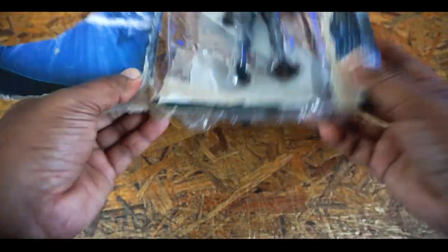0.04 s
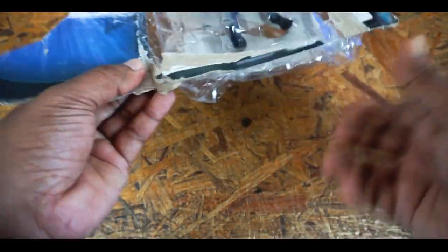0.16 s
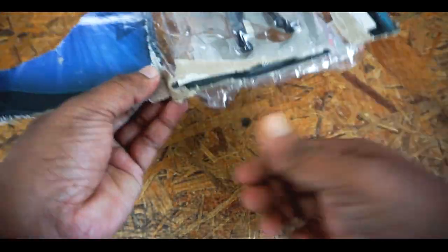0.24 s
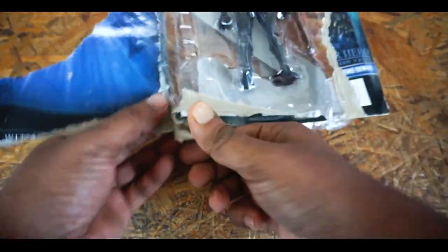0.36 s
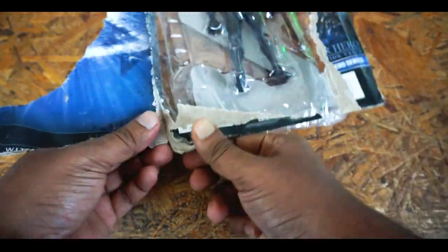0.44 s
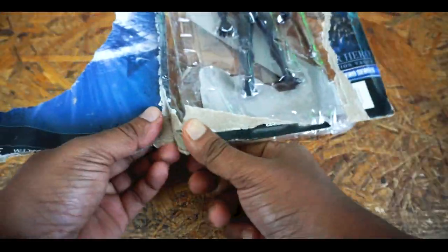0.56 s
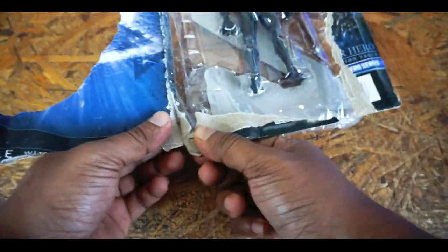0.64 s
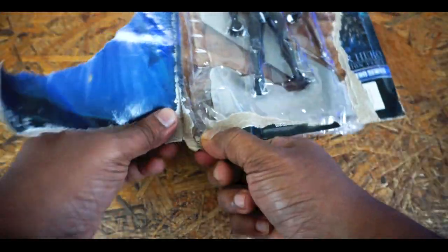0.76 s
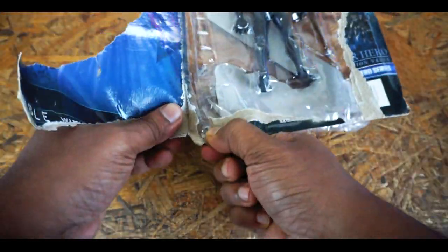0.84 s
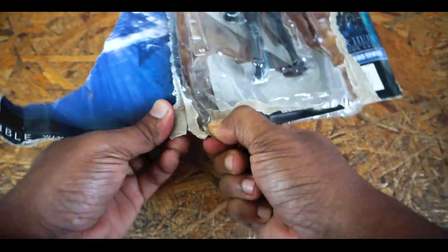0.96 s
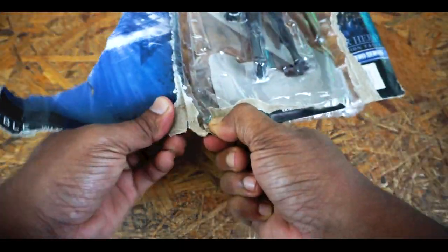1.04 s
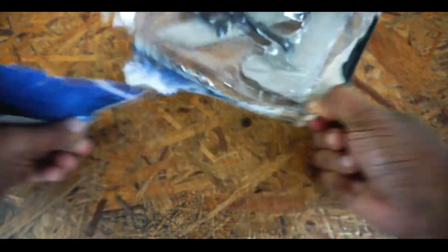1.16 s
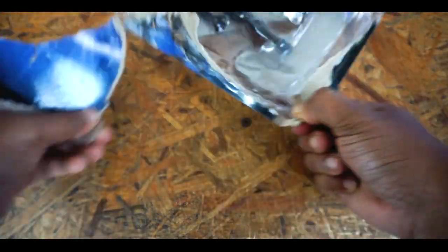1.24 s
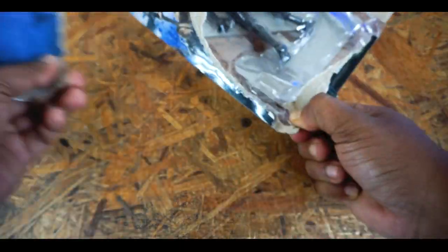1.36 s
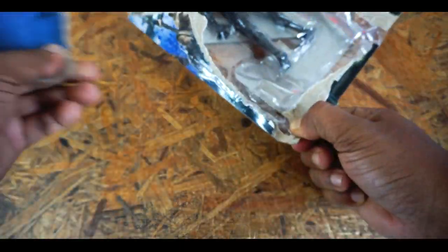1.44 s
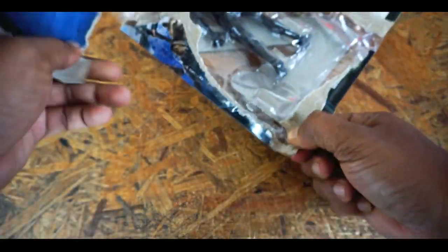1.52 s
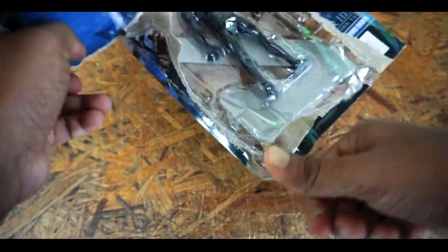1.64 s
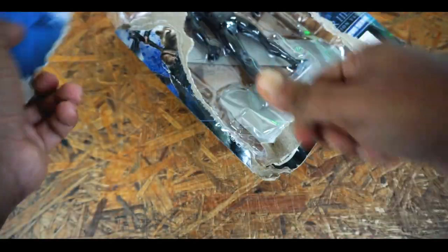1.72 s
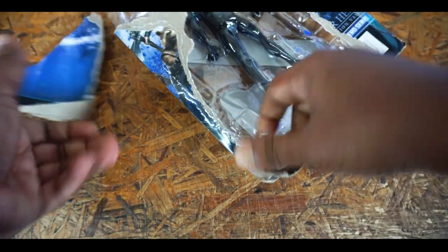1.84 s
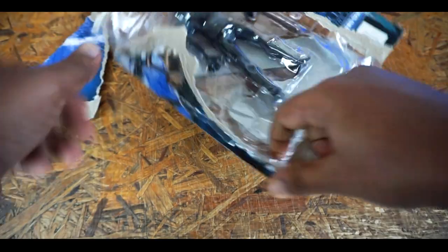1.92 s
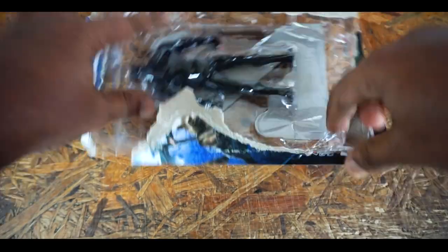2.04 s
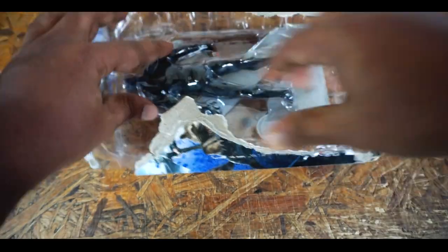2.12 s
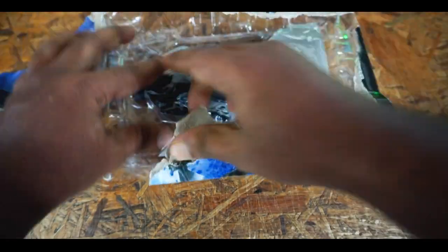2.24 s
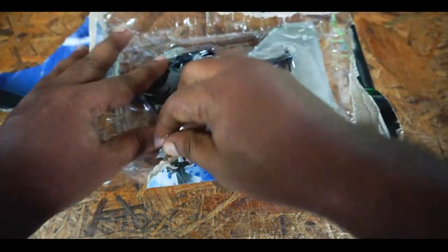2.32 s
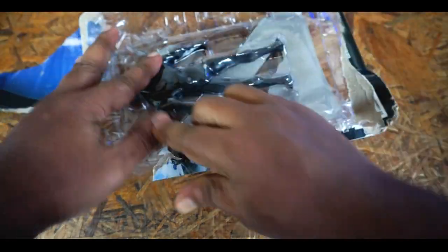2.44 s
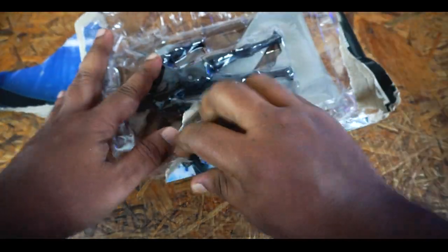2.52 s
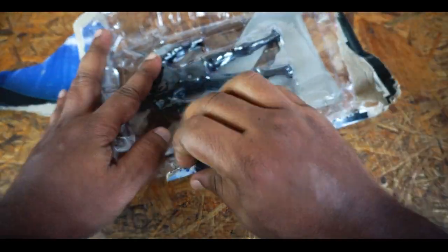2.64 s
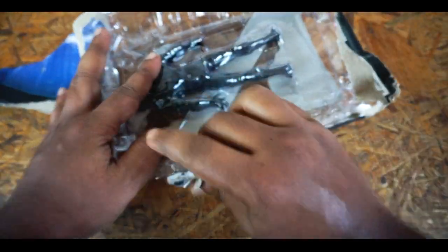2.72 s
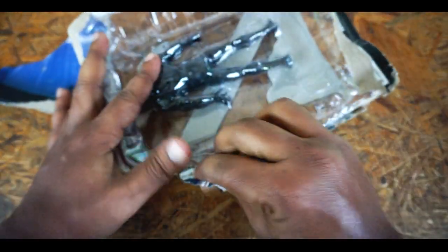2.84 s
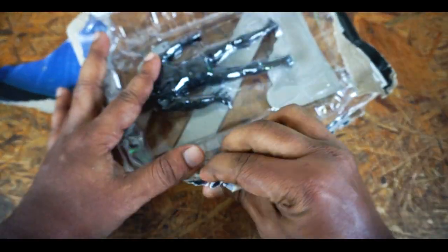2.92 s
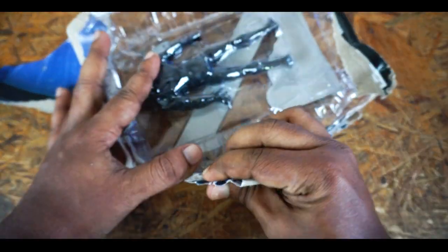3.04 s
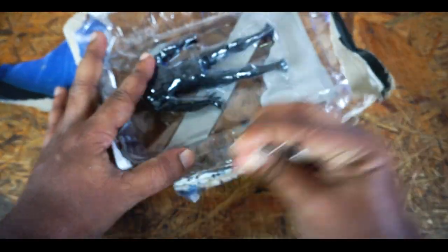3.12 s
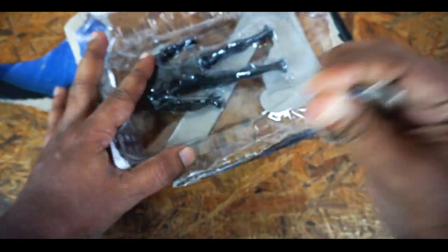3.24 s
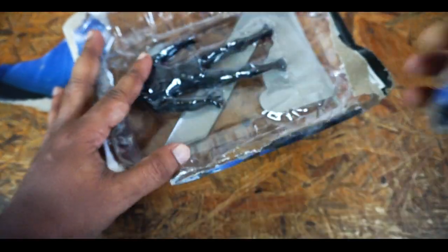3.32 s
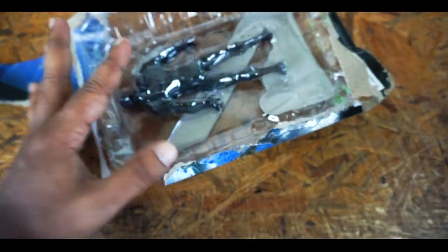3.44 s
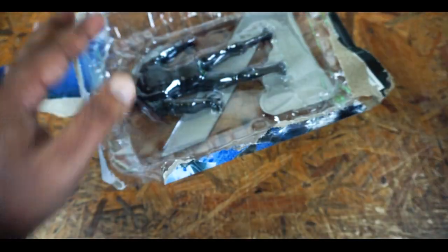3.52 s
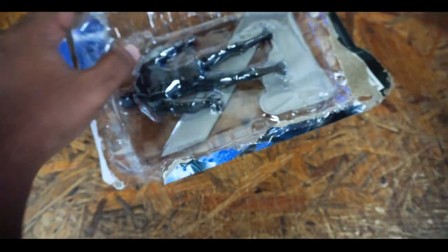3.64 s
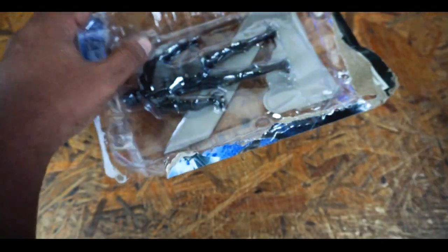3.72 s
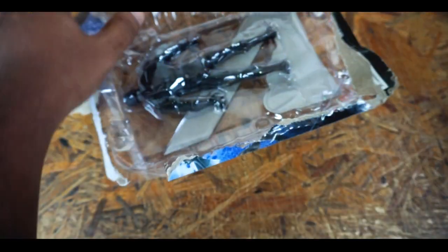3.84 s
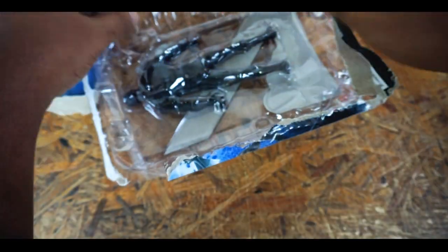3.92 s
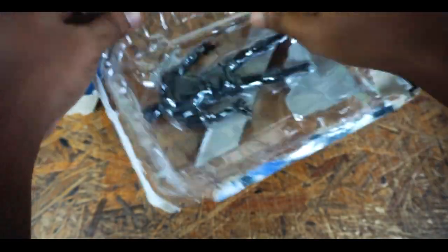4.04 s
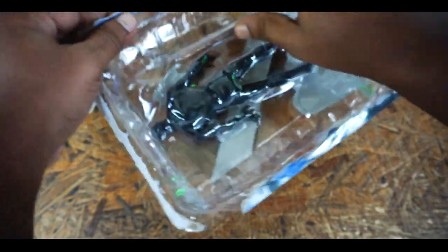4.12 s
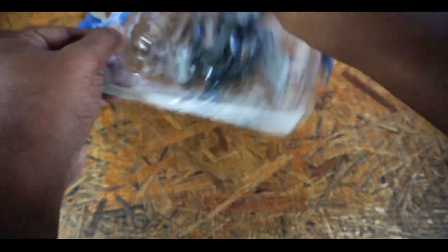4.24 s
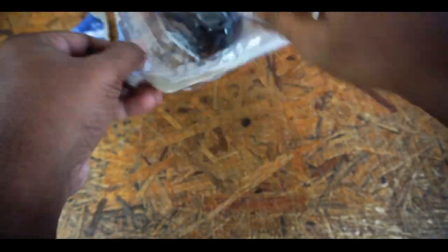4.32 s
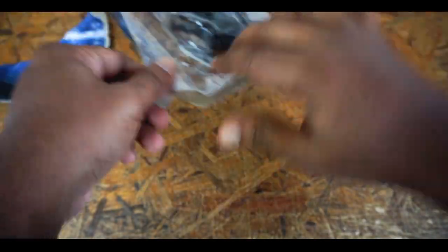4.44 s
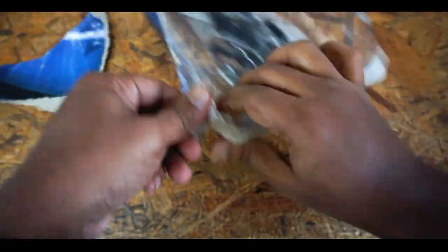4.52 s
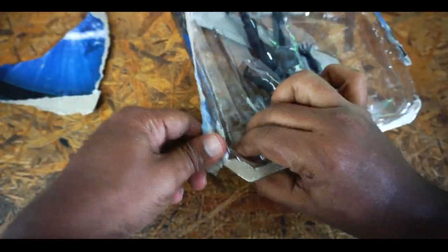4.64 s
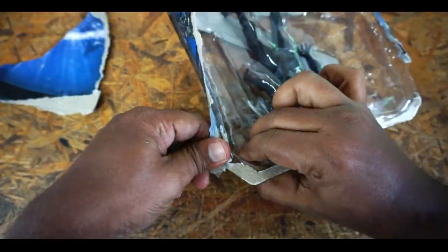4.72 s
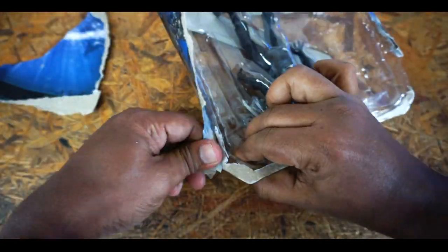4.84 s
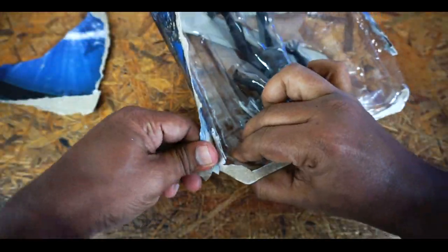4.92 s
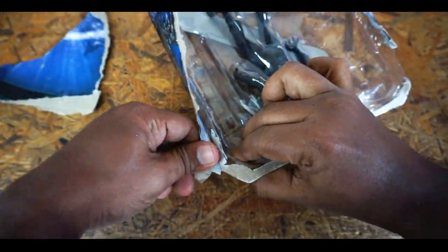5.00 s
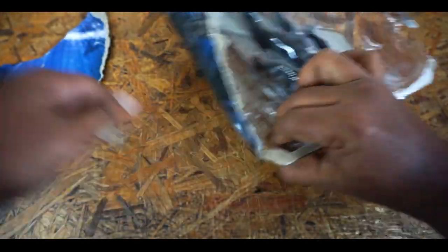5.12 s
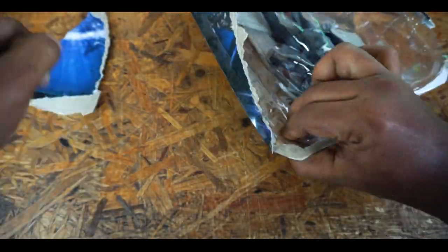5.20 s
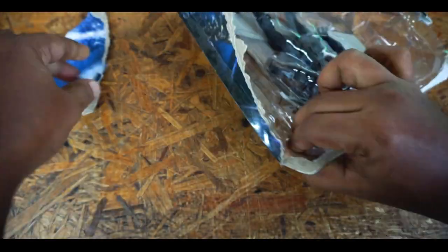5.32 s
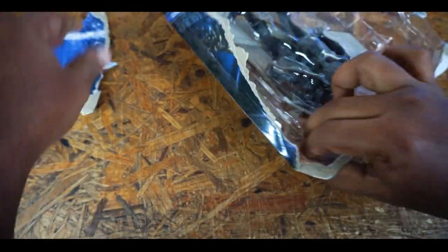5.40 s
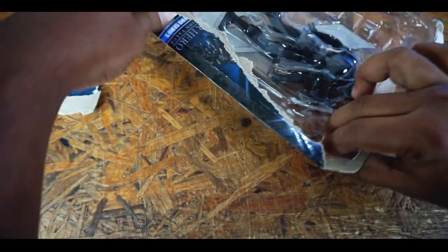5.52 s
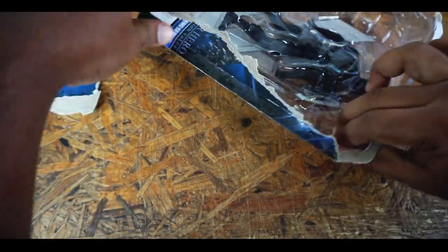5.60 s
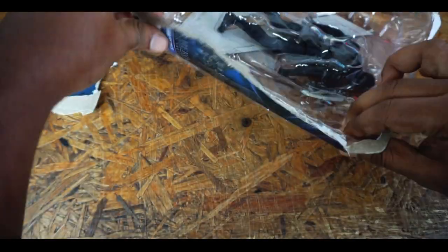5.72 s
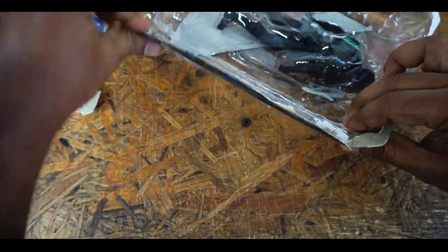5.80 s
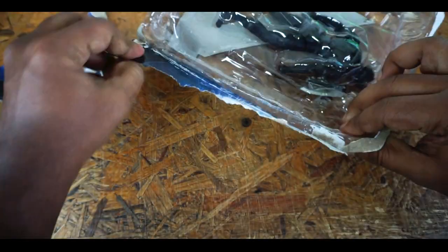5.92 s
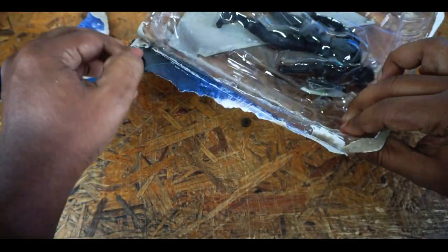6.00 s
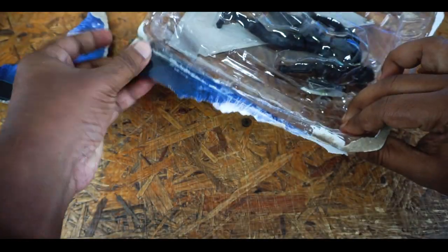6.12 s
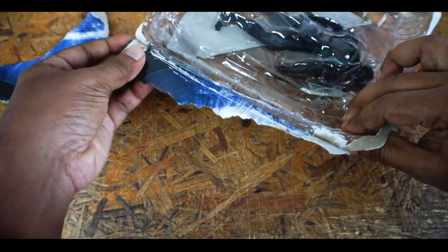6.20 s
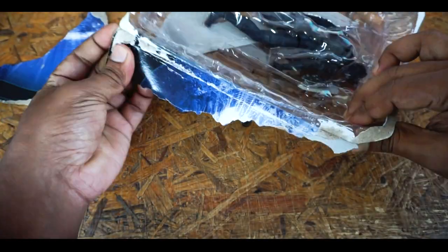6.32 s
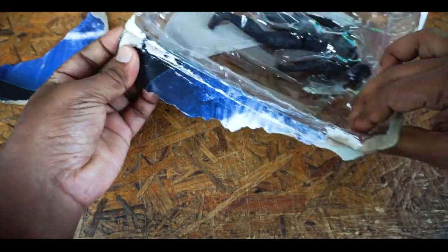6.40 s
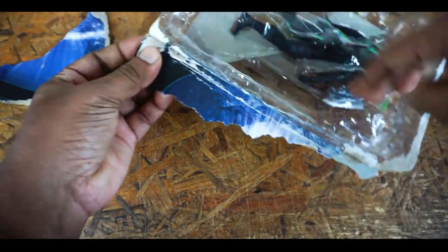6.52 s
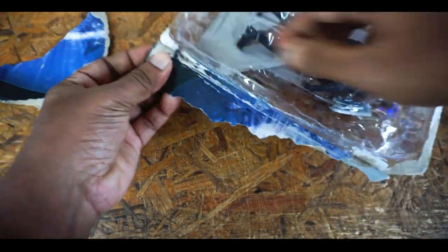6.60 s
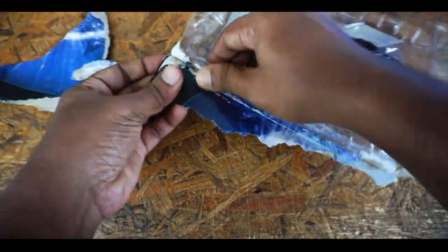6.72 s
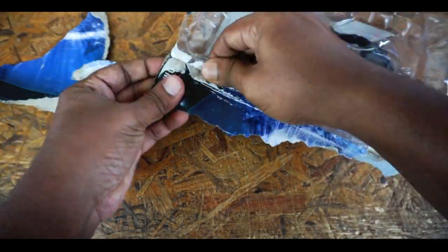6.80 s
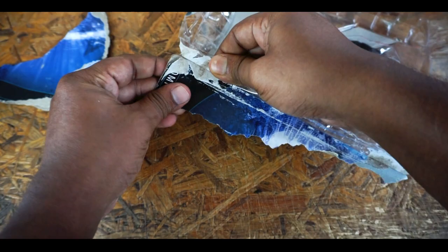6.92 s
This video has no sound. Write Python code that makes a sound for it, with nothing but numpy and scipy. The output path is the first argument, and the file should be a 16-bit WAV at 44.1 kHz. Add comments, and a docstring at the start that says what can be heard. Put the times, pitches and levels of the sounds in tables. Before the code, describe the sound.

Close stereo sound in a small room: fingers grip, rub and crinkle a plastic blister pack while its cardboard backing lets go in quick runs of ticks. Loud dry snaps cluster, pause, then return, densest around three and four and a half seconds, with later separate tugs. Low hollow knocks and a brief scrape come from the shell on a wooden board.

```python
"""Sharp snaps lead: creases and glue spots let go as hands pull a cardboard backing off a plastic blister.
Each snap is a short noise burst through the resonance of a small panel; the card peels in runs of ticks.
With each grip card and plastic rub and crinkle as filtered grains, and small creases crackle.
The hollow shell rumbles and knocks on a chipboard table through a few low modes, and its rim slides.
Noise echoes make a small room; a close stereo microphone turns down quiet bands and limits peaks."""
import sys
import numpy as np
from scipy import signal
from scipy.fft import rfft, irfft, next_fast_len
from scipy.io import wavfile
from scipy.ndimage import uniform_filter1d, minimum_filter1d

SR = 44100
rng = np.random.default_rng(int(sys.argv[2]) if len(sys.argv) > 2 else 0)


def inscribe(sig):
    """Save sig as 16-bit PCM at rate SR to the path in sys.argv[1].

    A 1-D sig is mono; a 2-D sig holds one channel per row.
    Samples are clipped to [-1, 1] before scaling.
    """
    pcm = np.round(np.clip(np.atleast_2d(sig).T, -1, 1) * 32767)
    wavfile.write(sys.argv[1], SR, pcm.astype(np.int16))


N = 306936
TIME = np.arange(N) / SR
# treble balance of the left port against the right, for all that the hands and the whole shell do
HANDS_PAN_DB = -4

# modes of the hollow shell on the board: pitch_hz, width_hz, relative_level_db
BODY_MODES = [(169, 14, -9), (253.9, 9, 1.5), (336, 28, 0.5), (390, 33, 3), (456.4, 7, -4.5),
              (536, 18, 5.5), (660, 64, -3)]
# grips, in which the fingers press, shift or turn the pack:
# start_s, hold_s, rubbing_db, crinkle_db, hollow_body_db
GRIPS = [(0, 0.0052, -42, -38, -78), (0.031, 0.13, -44, -30.5, -62.5), (0.373, 0.033, -59.5, -74, -60.5),
         (0.407, 0.029, -29.5, -34.5, -48.5), (0.455, 0.15, -44, -45.5, -56),
         (0.66, 0.22, -52.5, -41.5, -84), (0.913, 0.15, -50, -52, -69.5), (1.154, 0.068, -31, -26.5, -43.5),
         (1.233, 0.048, -29, -32, -41), (1.329, 0.077, -34, -54.5, -37.5), (1.443, .13, -65, -60, -64.5),
         (1.666, 0.029, -45, -40, -60.5), (1.743, 0.023, -52.5, -46.5, -60),
         (1.894, 0.27, -39.5, -45.5, -55.5), (2.208, 0.079, -44, -48, -59),
         (2.458, 0.056, -36, -39.5, -50.5), (2.632, 0.18, -47, -48.5, -68.5),
         (2.881, .045, -33.5, -37, -64.5), (3.031, 0.075, -39.5, -32.5, -64.5),
         (3.18, 0.086, -31, -35, -64), (3.458, 0.059, -36.5, -48, -49), (3.769, 0.12, -49.5, -46.5, -89),
         (4.024, 0.026, -47, -55, -64.5), (4.077, 0.1, -46, -49, -60), (4.242, 0.1, -32, -44, -47),
         (4.295, .11, -26.5, -39, -38.5), (4.577, 0.12, -44.5, -45.5, -63.5), (4.619, 0.049, -33, -52, -50),
         (4.71, 0.17, -49.5, -50, -70.5), (4.865, .08, -62, -63, -71.5), (5.042, 0.087, -62.5, -58, -76),
         (5.115, .015, -51, -46, -74.5), (5.138, 0.093, -33, -38, -44.5), (5.32, 0.15, -58, -56, -66),
         (5.437, 0.086, -52, -48, -65), (5.537, 0.022, -64, -74, -61), (5.647, 0.039, -55.5, -59.5, -59),
         (5.701, 0.14, -46, -45, -60), (5.936, 0.096, -45.5, -42.5, -76), (6.138, .28, -50.5, -47, -70.5),
         (6.451, 0.067, -43, -57, -76), (6.523, 0.037, -34.5, -51, -52.5),
         (6.782, 0.2, -41.5, -42.5, -70.5)]
# loud snaps of the shell: start_s, level_db, panel_pitch_hz, low_corner_hz, treble_tilt_db_per_octave
LOUD_SNAPS = [(.072, 4.5, 3240, 1170, -2.5), (.089, 8, 3640, 900, -1.5), (0.095, 8.5, 3500, 990, -6.5),
              (0.132, 6.5, 3980, 2970, -3), (.42, 11.5, 3880, 840, -13.5), (0.44, 2, 4250, 1100, -1.5),
              (.491, 16, 1970, 1420, -18.5), (.506, 14.5, 8300, 1350, -11.5), (.515, 3.5, 4030, 1140, 2),
              (0.552, 10, 2550, 2360, -4.5), (0.656, -8.5, 1750, 1380, -8), (.667, 4.5, 3870, 1720, -4),
              (.6755, 5, 3810, 1570, 7.5), (.684, -1, 4100, 1340, 9.5), (0.78, -6, 1780, 2370, 5.5),
              (.819, 6, 1600, 2060, 7.5), (0.905, -2, 910, 2960, 5.5), (.944, -4, 9300, 1440, -1),
              (1.034, -3, 1830, 1770, -16), (1.055, -5, 3000, 1970, 1.5), (1.138, -9, 1810, 1480, 5),
              (1.164, 5, 2820, 830, -0.5), (1.171, 9, 2010, 780, -12.5), (1.179, 10.5, 1890, 1290, -2.5),
              (1.186, 9, 1930, 670, -5), (1.192, -2.5, 2180, 970, 12), (1.269, 7, 2800, 740, 4),
              (1.354, 15.5, 2360, 930, -6.5), (1.36, 10, 3900, 630, -4), (1.6665, -6.5, 2880, 2180, 6.5),
              (1.755, -25.5, 2940, 1480, 9), (1.929, -4.5, 3220, 650, -2), (1.958, 11.5, 3660, 1030, -18.5),
              (2.012, -1, 1570, 930, -26), (2.057, 4.5, 920, 1270, -15.5), (2.128, 3.5, 2970, 640, -28),
              (2.149, 14, 1160, 1640, -6.5), (2.235, -7, 1920, 786, -1), (2.243, -3, 1300, 870, -18),
              (2.256, -7, 2100, 940, -3), (2.266, -3.5, 1960, 970, -0.5), (2.328, 9.5, 5360, 1300, -14.5),
              (2.334, 1, 5950, 1490, -6.5), (2.352, 4.5, 2070, 960, -8), (2.446, 8.5, 5730, 1330, -6.5),
              (2.473, 1, 3740, 736, -4), (2.511, 9, 2080, 1120, -28), (2.549, -1, 2140, 1130, 5.5),
              (2.652, 5.5, 6860, 1250, -5.5), (2.69, 2.5, 1930, 1510, -3.5),
              (2.704, 10.5, 1230, 1420, -4.5), (2.749, 6.5, 5650, 1690, -10), (2.803, -7, 4010, 1440, -9.5),
              (2.889, 12.5, 4660, 1580, -8.5), (2.925, 6.5, 1870, 1620, -14),
              (2.941, -1.5, 5340, 1470, -9.5), (2.959, 0, 1850, 1590, 0), (3.005, -4, 3870, 1430, -9),
              (3.014, 7.5, 1140, 1540, -12), (3.025, 18, 2510, 2400, -7.5), (3.035, 15, 8700, 1380, -7.5),
              (3.117, 8.5, 1770, 1110, -8.5), (3.132, 18, 4400, 1150, -8.5), (3.149, 9, 2420, 880, -8),
              (3.167, 5, 2400, 1040, -17), (3.19, 12, 3240, 624, -4), (3.197, 9, 2290, 770, 4.5),
              (3.207, 7.5, 1190, 1250, 1), (3.24, 6.5, 4910, 1110, 5), (3.264, 7.5, 6560, 1700, -0.5),
              (3.3, -5.5, 5450, 1320, 2.5), (3.382, 11.5, 1190, 1290, -12), (3.403, 8, 2060, 1850, -7.5),
              (3.438, 14, 1380, 1810, -23.5), (3.474, 9.5, 1080, 1070, -18),
              (3.485, 14.5, 1950, 1290, -12.5), (3.499, 4.5, 3890, 680, -5), (3.521, 4, 2940, 830, -18),
              (3.537, 1, 2900, 1160, -16.5), (3.557, 17, 1150, 2590, -13), (3.6, 3, 8960, 2270, -3.5),
              (3.764, -0.5, 5770, 1395, -13.5), (3.776, 0.5, 1880, 1100, -2), (3.826, 6.5, 5860, 1296, -6),
              (3.9, -18, 7600, 3190, 20.5), (4.043, -7.5, 2800, 1100, -31.5),
              (4.129, 6.5, 4030, 1960, -14.5), (4.15, 5.5, 3330, 1830, -16.5), (4.2433, 1, 3530, 760, -11),
              (4.263, 14, 3180, 1890, -11.5), (4.289, 7.5, 2150, 598, -12), (4.31, 4, 2450, 730, -12.5),
              (4.328, 7.5, 2640, 1150, -21.5), (4.335, 9, 2760, 1100, -9.5), (4.361, 19, 3600, 1470, -12.5),
              (4.372, 1.5, 2610, 985, -8.5), (4.388, -2, 2510, 640, -0.5), (4.405, 19, 3780, 1190, -6.5),
              (4.413, 15.5, 4200, 1220, -9.5), (4.417, 8.5, 2670, 1016, -6.5), (4.55, -8.5, 6100, 1630, -8),
              (4.573, -11, 6330, 1180, -2.5), (4.597, -26, 6470, 970, 9), (4.6357, 14.5, 3630, 1740, -11.5),
              (4.677, 2, 4860, 1070, -10.5), (4.736, -1, 3950, 1110, -15), (4.743, 1.5, 5900, 1590, 4.5),
              (4.768, 7.5, 1370, 1610, -4), (4.823, 1.5, 1490, 1240, -22), (4.858, 10.5, 1710, 1530, -5),
              (4.941, -5.5, 7530, 1980, -6), (5.042, -19.5, 4500, 1200, -6), (5.135, 12.5, 6060, 1910, -10),
              (5.153, 12, 2610, 1000, -6), (5.17, 8, 1420, 1230, -6.5), (5.181, 14, 1050, 1390, -8.5),
              (5.234, 1.5, 3380, 980, -12), (5.352, 9.5, 1680, 1890, -18.5),
              (5.433, 17.5, 4380, 1480, -18.5), (5.446, 9, 3490, 1390, -22),
              (5.51, -7.5, 4200, 1500, -10.5), (5.715, -1.5, 2950, 1170, -15), (5.755, 13.5, 900, 1840, -6),
              (5.826, -7.5, 2770, 830, 0), (5.953, 10.5, 2320, 1700, -12.5), (5.994, 7.5, 2110, 2440, -7.5),
              (6.158, 5.5, 2460, 2700, -19.5), (6.202, 2.5, 3080, 1760, 1), (6.23, 6.5, 2440, 1750, 2.5),
              (6.317, 10.5, 8140, 2330, -7.5), (6.339, 6, 2520, 1700, -7), (6.367, 12, 2340, 2260, -0.5),
              (6.397, 2, 1710, 2270, -1), (6.422, 3, 2490, 2060, -4), (6.475, 2.5, 3110, 1110, -23),
              (6.495, -1, 1850, 1150, -24), (6.519, 9, 7250, 2500, -14.5), (6.533, 14, 970, 2150, -9.5),
              (6.547, 9.5, 4080, 990, -10.5), (6.579, 16, 7740, 1520, -13.5), (6.613, 3.5, 4560, 1040, -1),
              (6.81, 12.5, 7700, 2120, -10), (6.821, 3.5, 3950, 1470, 6.5), (6.882, 7, 3670, 1780, -8.5),
              (6.91, 14, 1290, 1520, -23), (6.932, 10, 1300, 1150, -5)]


def undb(db):
    """Decibels to gain."""
    return 10 ** (np.asarray(db) / 20)


def unit(x):
    """Scale to an rms of one."""
    return x / np.sqrt(np.mean(x ** 2))


def along(points, hz):
    """Read a spectrum table on a log-frequency axis."""
    f, value = np.transpose(points)
    return np.interp(np.log(hz + 1), np.log(f), value)


def shape(x, response):
    """Filter by a response given as a function of frequency."""
    n = x.shape[-1]
    size = next_fast_len(n + 2048)  # padding for the filter's tail
    f = np.arange(size // 2 + 1) * SR / size
    return irfft(rfft(x, size) * response(f), size)[..., :n]


def colour(x, points):
    """Filter by a spectrum table of pitch_hz, level_db."""
    return shape(x, lambda f: undb(along(points, f)))


def resonance(f, hz, width):
    """Response of one mode, gain one at its centre."""
    return 1j * f * width / (hz ** 2 - f ** 2 + 1j * f * width)


def ports(f, pan_db, shadow_hz=1000):
    """Left and right responses: the body of the microphone shades only short waves."""
    # phase lead of the left microphone port: pitch_hz, lead_radians
    lead = [(60, 0.094), (250, 0.12), (600, 1.65), (2000, 1.295), (6000, 1.22), (9000, 1.26), (16000, 1.4)]
    shade = undb(pan_db * f ** 2 / (f ** 2 + shadow_hz ** 2))
    left = shade * np.exp(1j * along(lead, f))
    even_power = np.sqrt(2 / (1 + abs(left) ** 2))
    return np.array([left, np.ones(len(f))]) * even_power


def spread(pair, f, apart_hz=7500):
    """Two unrelated spectra become alike in the bass and stay partly apart in the treble."""
    own = f / (f + apart_hz)
    left = np.sqrt(1 - own) * pair[0] + np.sqrt(own) * pair[1]
    return np.array([left, pair[0]])


def room(direct, left_db=-5.5, build_s=0.0019, count=28):
    """Near walls answer within a few ms; the pattern of echoes changes as the pack moves."""
    # colour of the room's echo: pitch_hz, relative_level_db
    wall_colour = [(100, 13.5), (700, 1), (2000, -1), (5000, -2), (10000, -2), (16000, -5)]
    t60_s, echo_db = 0.23, -7.5
    t = np.arange(SR // 2) / SR
    fade = undb(-60 * t / t60_s) * (1 - np.exp(-(t / build_s) ** 2))
    hop = N // count
    size = next_fast_len(2 * hop + len(t))
    f = np.arange(size // 2 + 1) * SR / size
    walls = ports(f, left_db) * undb(along(wall_colour, f) + echo_db) / np.sqrt(np.sum(fade ** 2))
    # overlapping stretches, each with its own echo pattern
    blend = np.sin(np.pi * np.arange(2 * hop) / (2 * hop))
    source = np.pad(direct[1], (hop, 2 * hop))
    out = np.zeros((2, N + hop + size))
    for start in range(0, N + hop, hop):
        noise = rng.standard_normal((2, len(t))) * fade
        echo = spread(rfft(noise, size), f, apart_hz=1500) * walls
        stretch = rfft(source[start:start + 2 * hop] * blend, size)
        out[:, start:start + size] += irfft(echo * stretch, size)
    return out[:, hop:hop + N]


def effort(levels_db, rest_db, release_s, attack_s=0.016):
    """Gain over time: each grip builds up, holds and dies away over a steady resting level."""
    power = np.full(N, undb(rest_db) ** 2)
    for (start, hold, *_), db in zip(GRIPS, levels_db):
        span = slice(int(start * SR), int((start + hold + .5) * SR))
        age = TIME[span] - start
        rise = np.clip(age / attack_s, 0, 1)
        fall = np.exp(-np.maximum(age - hold, 0) / release_s)
        power[span] += (undb(db) * rise * fall) ** 2
    return np.sqrt(power)


def settling(relative_db, decay_s=0.011):
    """Gain over time of the motion that each loud snap leaves behind, dying away exponentially."""
    kicks = np.zeros(N)
    for s, db, *_ in LOUD_SNAPS:
        kicks[int(s * SR)] += undb(db + relative_db)
    return signal.lfilter([1], [1, -np.exp(-1 / (decay_s * SR))], kicks)


def grains(rate, scatter_db, ring_s, hiss):
    """Tiny slips of uneven size, each a short burst, over smooth friction; both ports hear the same slips."""
    sizes = undb(scatter_db * np.minimum(rng.exponential(size=N), 4))
    slips = sizes * (rng.random(N) < rate / SR)
    power = signal.lfilter([1], [1, -np.exp(-2 / (ring_s * SR))], slips ** 2)
    power = power / power.mean() + hiss
    # even out the slower swells
    power /= uniform_filter1d(power, size=2000)
    return np.sqrt(power) * rng.standard_normal((2, N))


def hollow_body():
    """Bumps on the board excite the low modes of the hollow shell and a dull thud."""
    # colour of the dull bumps on the board: pitch_hz, relative_level_db
    thud = [(30, -30), (90, -44.5), (160, -26), (300, 4), (600, 19), (1000, 11.5), (3000, -34)]
    bumps = grains(rate=120, scatter_db=4.5, ring_s=.005, hiss=.25)
    hollow = shape(bumps, lambda f: sum(undb(db) * resonance(f, hz, width) for hz, width, db in BODY_MODES))
    return unit(hollow + undb(-3) * colour(bumps, thud))


def slides():
    """The shell's rim catches and slips as it slides over card and board, ringing at one pitch a stroke."""
    # sliding strokes: start_s, length_s, pitch_hz, level_db
    strokes = [(0.073, 0.2, 3710, -40.5), (0.82, 0.096, 1550, -59), (1.414, 0.2, 2800, -53.5),
               (1.643, 0.071, 3060, -40.5), (1.742, 0.03, 2930, -39), (1.887, 0.39, 1025, -48),
               (4.291, 0.1, 2500, -19), (4.549, 0.045, 6300, -42.5), (4.553, 0.037, 1440, -46),
               (4.848, 0.08, 1900, -44), (5.658, 0.03, 1930, -51), (6.155, 0.62, 1404, -57)]
    slips = grains(rate=300, scatter_db=4.5, ring_s=.003, hiss=.2)
    out = np.zeros((2, N))
    for start, length, hz, db in strokes:
        swell = np.sin(np.pi * np.clip((TIME - start) / length, 0, 1))
        out += undb(db) * swell * unit(shape(slips, lambda f: resonance(f, hz, hz / 3.2) ** 2))
    return out


def crinkling():
    """Dense, very short slips make the fine bright crinkle of the sheet."""
    # colour of the fine crinkle: pitch_hz, relative_level_db
    crisp = [(1000, -36), (3500, -2), (6000, -4), (9000, -5), (13000, -7), (16000, -10.5), (19000, -29.5)]
    return unit(colour(grains(rate=780, scatter_db=7.0, ring_s=0.0014, hiss=.25), crisp))


def rubbing(q=2.6):
    """Each panel is set ringing by its own slips, so the colour keeps shifting."""
    # panels that ring when card and plastic rub: pitch_hz, relative_level_db
    panels = [(950, -26.5), (1400, 2.5), (1900, 1), (2450, 1.5), (3000, -1.5), (3800, -1.5), (5200, -6)]
    out = np.zeros((2, N))
    for hz, db in panels:
        slips = grains(rate=110, scatter_db=4.5, ring_s=0.0073, hiss=0.23)
        out += undb(db) * shape(slips, lambda f: resonance(f, hz, hz / q) ** 2)
    return unit(out)


def handling(rub_gain, crinkle_gain, body_gain):
    """Fingers rub and crinkle the pack, its rim slides, and its hollow body rumbles on the board."""
    pair = rubbing() * rub_gain + crinkling() * crinkle_gain + hollow_body() * body_gain + slides()
    size = next_fast_len(N)
    f = np.arange(size // 2 + 1) * SR / size
    return irfft(spread(rfft(pair, size), f) * ports(f, HANDS_PAN_DB), size)[:, :N]


def knocks(contact_s=0.0024):
    """A soft blow rings the modes of the hollow shell; where it lands decides which of them lead."""
    # the shell bumps the board or flexes as a whole: start_s, level_db, most_strongly_driven_pitch_hz
    blows = [(.505, -60.5, 300), (1.192, -52.5, 257), (1.266, -50.5, 251), (1.358, -44, 272),
             (1.751, -65, 221), (2.151, -59.5, 258), (3.234, -58, 200), (3.495, -52.5, 450),
             (3.531, -63, 120), (4.12, -55, 394), (4.297, -63.5, 550), (4.653, -55.5, 260),
             (5.157, -55, 329), (6.54, -54, 522), (6.678, -67, 120)]
    t = np.arange(SR // 2) / SR
    out = np.zeros(N + SR)
    for s, db, lead_hz in blows:
        ring = np.zeros(len(t))
        chance = rng.standard_normal((len(BODY_MODES), 2))
        for (hz, width, mode_db), (detune, phase) in zip(BODY_MODES, chance):
            drive = undb(mode_db) / (1 + 2 * np.log2(hz / lead_hz) ** 2)
            wave = np.sin(2 * np.pi * hz * (1 + 0.0066 * detune) * t + np.pi * phase)
            ring += drive * np.exp(-np.pi * width * t) * wave
        # a soft contact rounds the onset
        ring *= 1 - np.exp(-(t / contact_s) ** 2)
        start = int(s * SR)
        # level set over the first 25 ms
        out[start:start + len(t)] += ring * undb(db) / np.std(ring[:SR // 40])
    return shape(out[:N], lambda f: ports(f, HANDS_PAN_DB))


def crackles(grip_gain, count=260, octaves=0.59, tilt_spread_db=3.0):
    """Small creases flip at chance moments, as strong as the grip; each has its own panel and sharpness."""
    over_rub_db, scatter_db = 27, 5
    typical_hz, corner_hz, typical_tilt_db = 2830, 1130, -9.5  # tilt per octave
    times = (np.arange(count) + rng.random(count)) * N / SR / count
    grip_db = 20 * np.log10(np.interp(times, TIME, grip_gain))
    rows = []
    for s, db, (strength, panel, sharpness) in zip(times, grip_db, rng.standard_normal((count, 3))):
        level_db = db + over_rub_db + scatter_db * strength
        pitch_hz = typical_hz * 2 ** (octaves * np.clip(panel, -2, 2))
        rows.append((s, level_db, pitch_hz, corner_hz, typical_tilt_db + tilt_spread_db * sharpness))
    return rows


def tears(count=12):
    """Glue spots let go in a quick, uneven run of bright ticks that weakens as the pull is spent."""
    # card peeling off its glue: start_s, length_s, typical_first_tick_level_db, panel_pitch_hz
    peels = [(0.693, .075, -4.5, 4100), (0.981, .045, -19.5, 1880), (1.21, .05, -14, 2165),
             (3.049, .06, -16, 3500), (3.222, .04, -9, 2950), (6.85, .075, -5, 3570)]
    ticks_per_s, jitter, scatter_db, fade_db_per_s = 98, 0.35, 2, 32  # jitter in tick intervals
    corner_hz, tilt_db = 1680, 5  # tilt per octave
    ticks = []
    for start, length, db, pitch_hz in peels:
        for k, (late, strength) in enumerate(rng.standard_normal((count, 2))):
            age = (k + jitter * late) / ticks_per_s
            if age < length:
                level_db = db - fade_db_per_s * age + scatter_db * strength
                ticks.append((start + age, level_db, pitch_hz, corner_hz, tilt_db))
    return ticks


def snap(db, pitch_hz, corner_hz, tilt, length, pan_db, ring=1.47, q=5.64, linger=1.3, linger_q=15.0,
         damping=1.161, steep=1.4, crack=0.79, size=4096, half_band=61):
    """A crease flips: bending waves cross a panel and its main mode lingers; a small one radiates no bass."""
    t = (np.arange(size) - 64) / SR  # the snap starts 64 samples in
    f = np.arange(size // 2 + 1) * SR / size
    age = np.maximum(t, 0)
    fade = (t >= 0) * np.exp(-(age / max(length, .001)) ** steep) * (1 + crack * np.exp(-age / 0.00081))
    waves = rfft(rng.standard_normal((2, size)) * fade)
    # flatten the broad spectrum, keeping its fine structure
    waves /= np.sqrt(uniform_filter1d(abs(waves) ** 2, 2 * half_band, axis=1))
    s = 1j * f / corner_hz
    radiation = (s * s / (s * s + damping * s + 1)) ** 2
    broad_mode = ring * resonance(f, pitch_hz, pitch_hz / q)
    lingering_mode = linger * resonance(f, pitch_hz, pitch_hz / linger_q)
    panel = 1 + broad_mode + lingering_mode
    # the quicker the flip, the more treble it holds
    edge = undb(tilt * np.log2(np.hypot(1, f / 3500) / np.hypot(1, f / 14000)))
    top = 1 / (1 + (f / 17000) ** 24)
    return irfft(spread(waves, f) * radiation * panel * edge * top * undb(db) * ports(f, pan_db))


def snaps(rows):
    """Snaps at their moments; each panel faces a slightly different way."""
    pan_db, pan_scatter_db = -7, 1
    # length at a 1 kHz corner and no tilt; a larger panel (lower corner) or a duller flip lasts longer
    length_s, shrink_power = 0.0039, 0.42
    doubling_db = 71.5  # fall of the tilt, per octave, that doubles the length
    out = np.zeros((2, N + SR))
    for (s, db, pitch_hz, corner_hz, tilt), facing in zip(rows, rng.standard_normal(len(rows))):
        length = length_s / (corner_hz / 1000) ** shrink_power * 2 ** (-tilt / doubling_db)
        sound = snap(db, pitch_hz, corner_hz, tilt, length, pan_db + pan_scatter_db * facing)
        start = max(int(s * SR) - 64, 0)  # allow for the 64-sample lead-in
        out[:, start:start + sound.shape[1]] += sound
    return out[:, :N]


def scene(count=2):
    """The pack in the hands, and the room around it."""
    _, _, rub_db, crinkle_db, body_db = np.transpose(GRIPS)
    # the resting levels are those of fingers that only hold the pack
    grip = effort(rub_db, rest_db=-69, release_s=0.02)
    crinkle = effort(crinkle_db, rest_db=-73.5, release_s=0.02)
    body = effort(body_db, rest_db=-76, release_s=0.025)
    # after a loud snap the sheet rustles briefly and the hollow body shakes
    rub_gain = np.hypot(grip, settling(-49.5))
    body_gain = np.hypot(body, settling(-80))
    quieter = handling(rub_gain, crinkle, body_gain) + knocks() + snaps(crackles(grip))
    loud = [*LOUD_SNAPS, *tears()]
    # a panel sends a different wave pattern in each direction, so the walls return a blend of them
    echo = sum(room(snaps(loud) + quieter) for _ in range(count)) / np.sqrt(count)
    return snaps(loud) + quieter + echo


def limiter(x, ceiling=0.9, size=220):
    """The gain dips smoothly for a few ms around a peak that would overload."""
    gain = ceiling / np.maximum(abs(x).max(axis=0), ceiling)
    held = minimum_filter1d(gain, size)
    return x * uniform_filter1d(uniform_filter1d(held, size // 2), size // 2)


def record(dry, hush_db=-82, depth_db=-18, top_hz=16100, size=512):
    """A noise suppressor turns down bands that fall quiet; the highest peaks are held and the top is cut."""
    _, _, bands = signal.stft(dry, nperseg=size)
    power = np.mean(abs(bands) ** 2, axis=0)
    # smooth over neighbouring bands, then over neighbouring moments
    power = uniform_filter1d(uniform_filter1d(power, size=9, axis=0), size=3, axis=1)
    quiet = 1 / np.sqrt(1 + np.maximum(power, 0) / undb(hush_db) ** 2)
    hushed = signal.istft(bands * undb(depth_db * quiet), nperseg=size)[1][:, :N]
    return shape(limiter(hushed), lambda f: 1 / (1 + (f / top_hz) ** 160))


dry = scene()
out = record(dry)
inscribe(out)
```